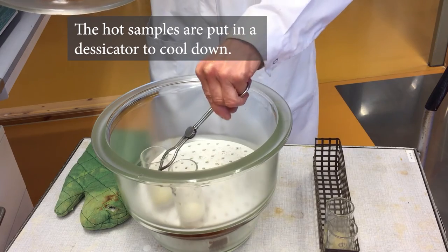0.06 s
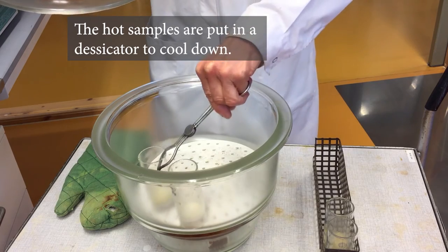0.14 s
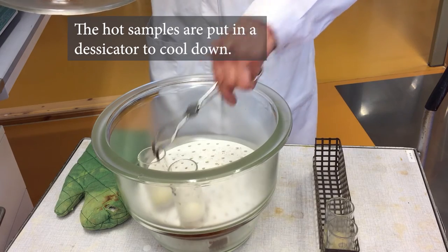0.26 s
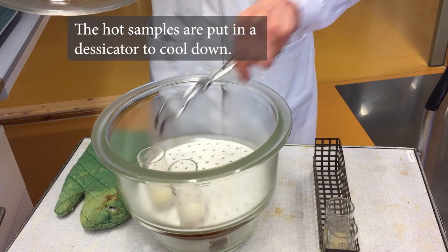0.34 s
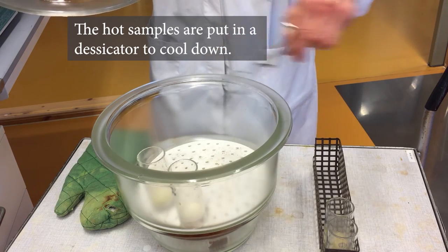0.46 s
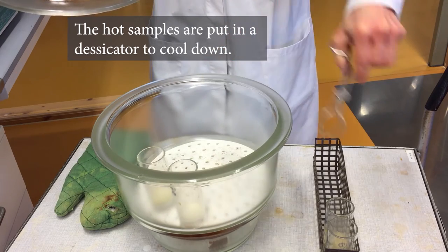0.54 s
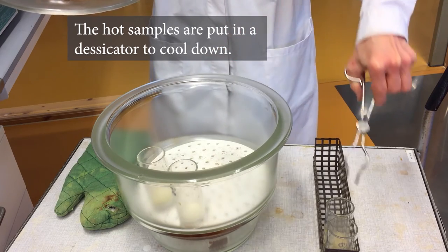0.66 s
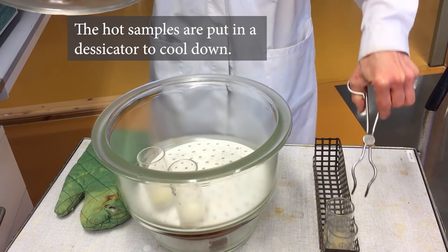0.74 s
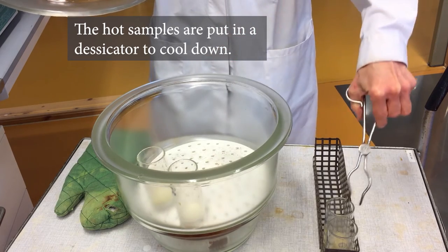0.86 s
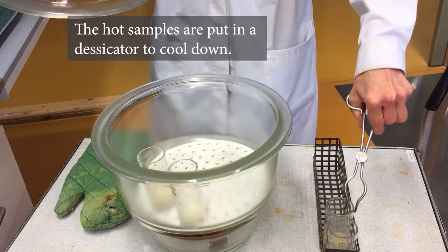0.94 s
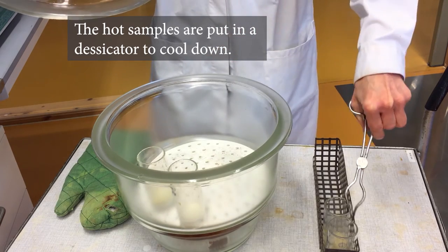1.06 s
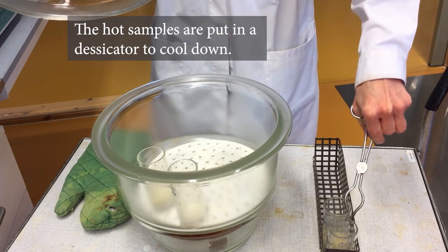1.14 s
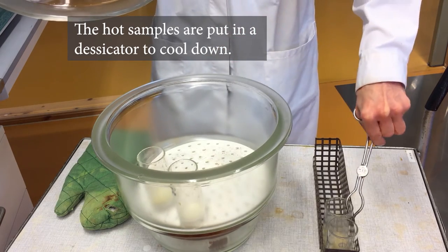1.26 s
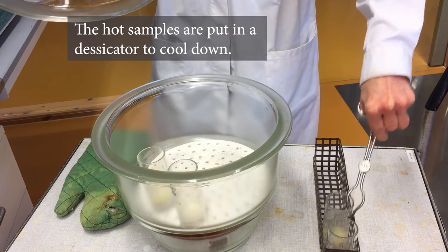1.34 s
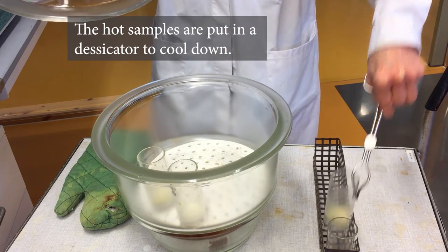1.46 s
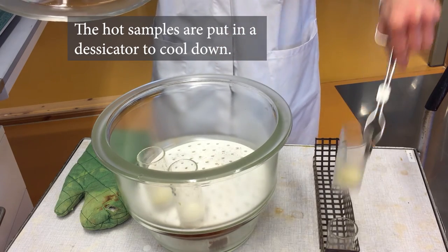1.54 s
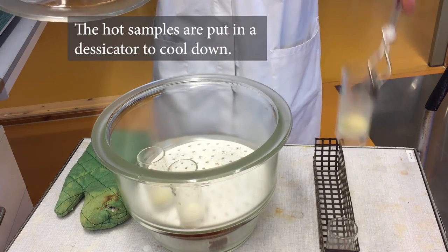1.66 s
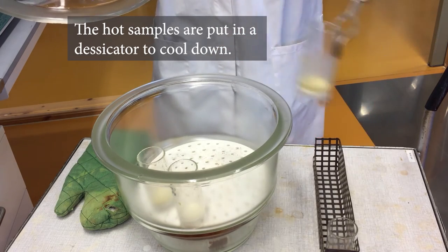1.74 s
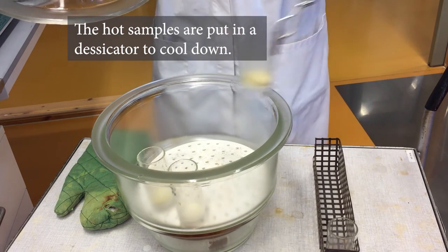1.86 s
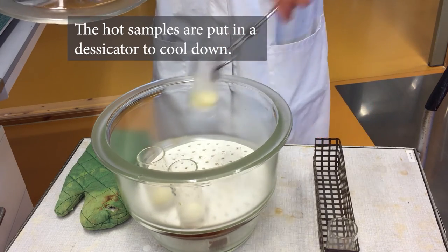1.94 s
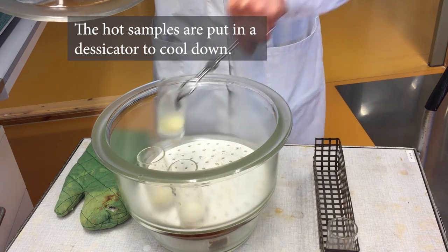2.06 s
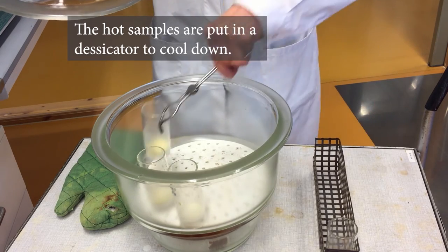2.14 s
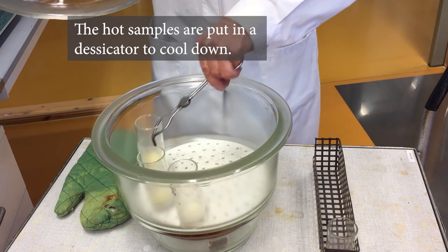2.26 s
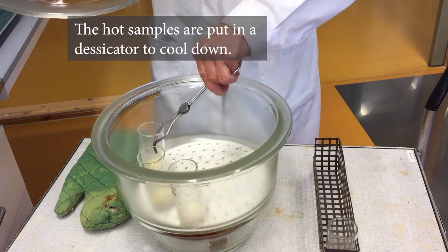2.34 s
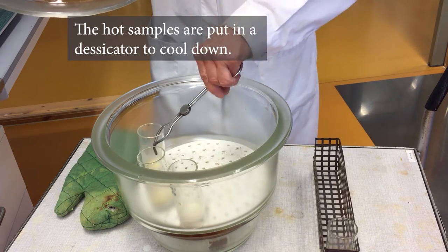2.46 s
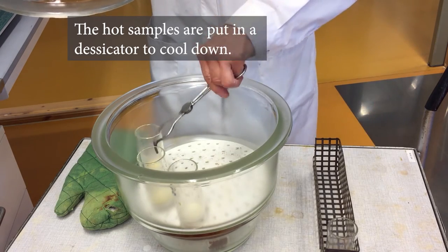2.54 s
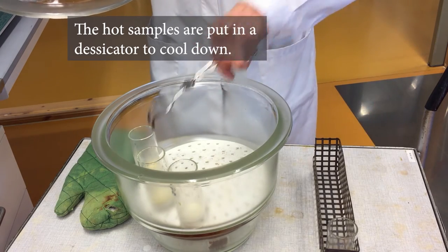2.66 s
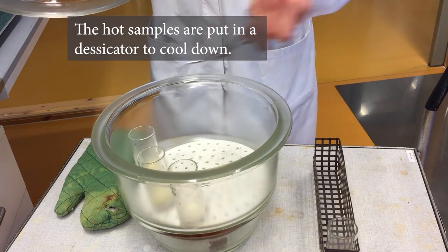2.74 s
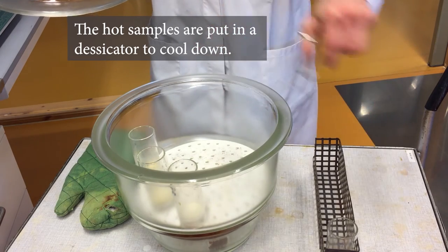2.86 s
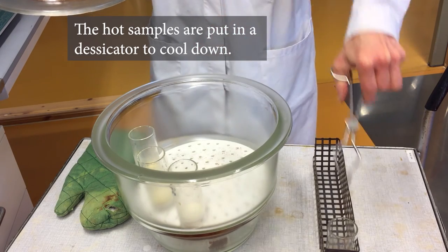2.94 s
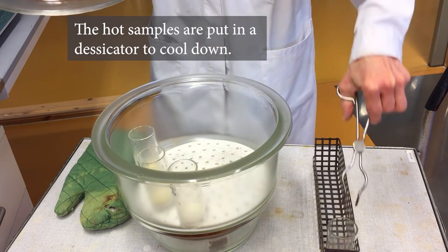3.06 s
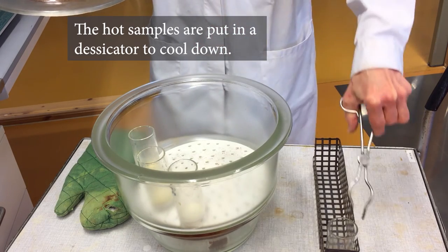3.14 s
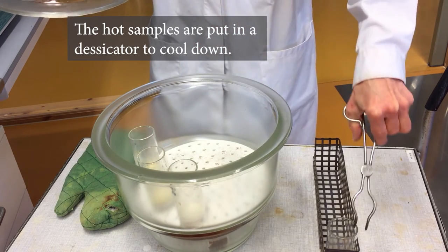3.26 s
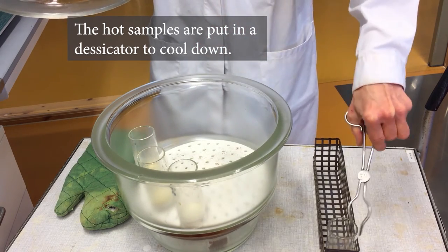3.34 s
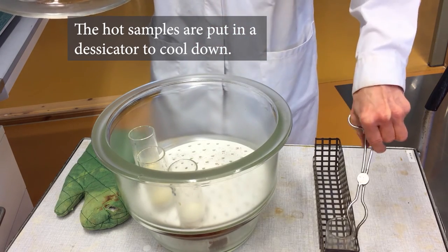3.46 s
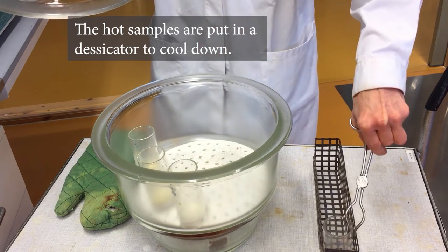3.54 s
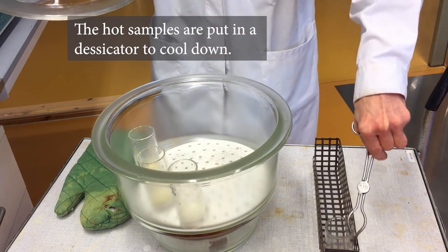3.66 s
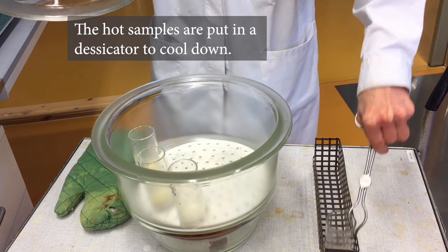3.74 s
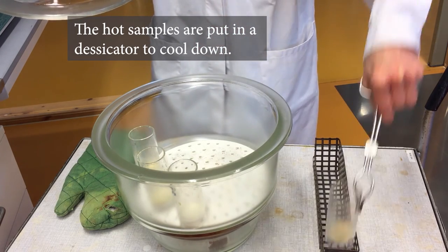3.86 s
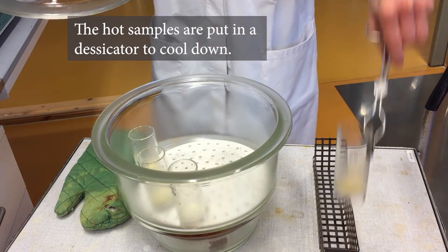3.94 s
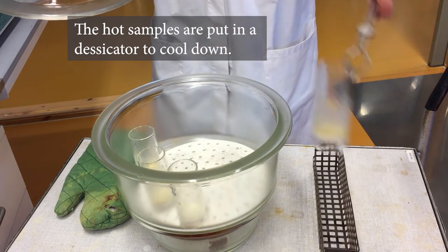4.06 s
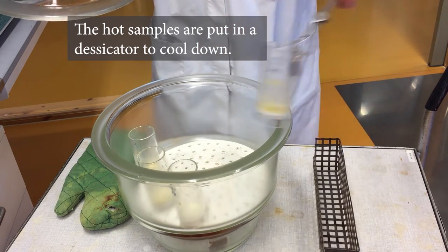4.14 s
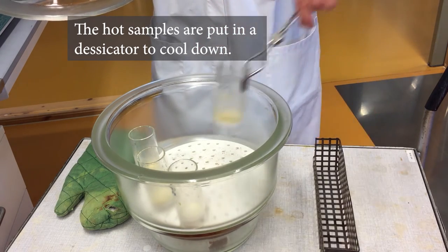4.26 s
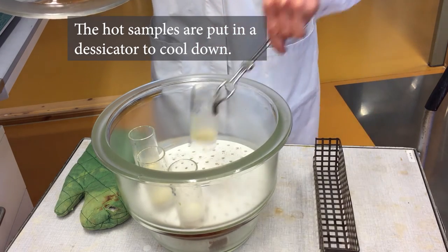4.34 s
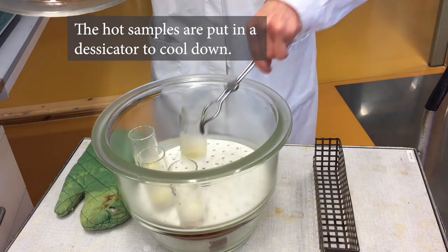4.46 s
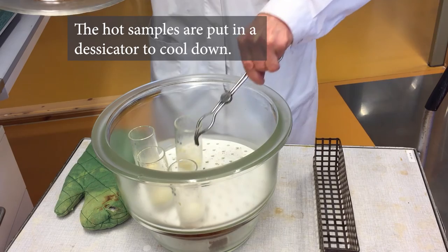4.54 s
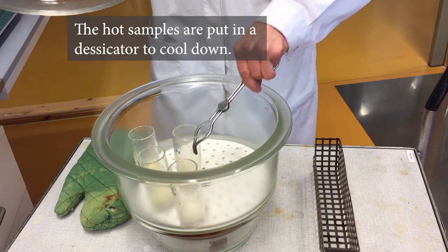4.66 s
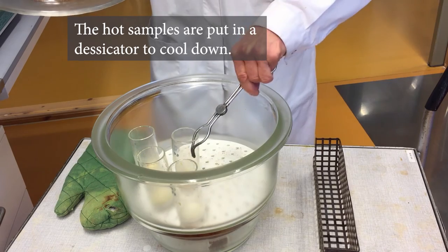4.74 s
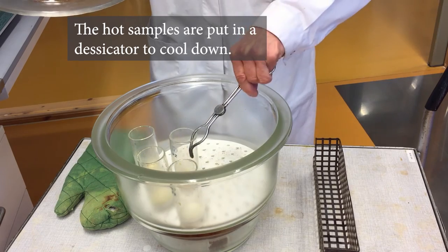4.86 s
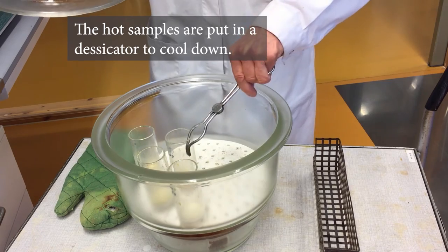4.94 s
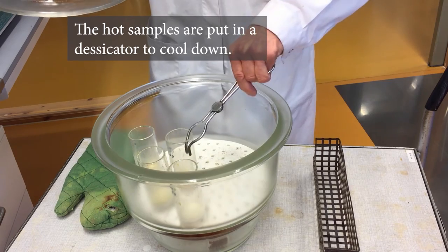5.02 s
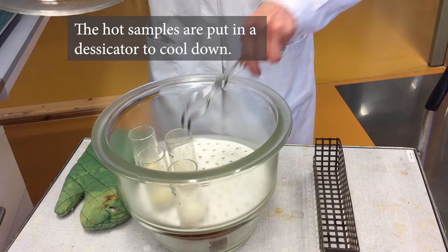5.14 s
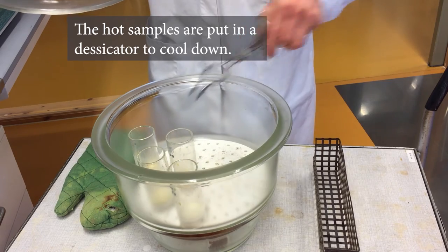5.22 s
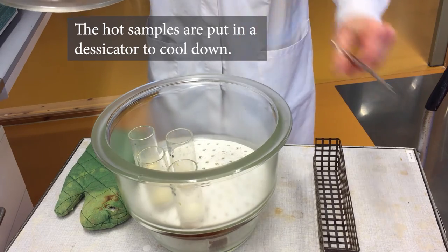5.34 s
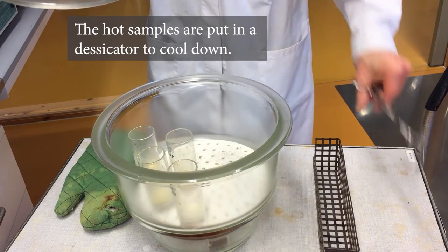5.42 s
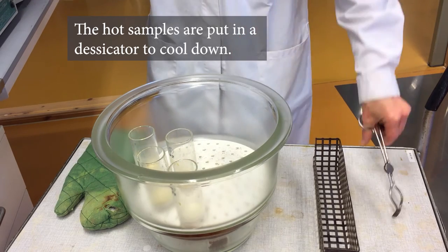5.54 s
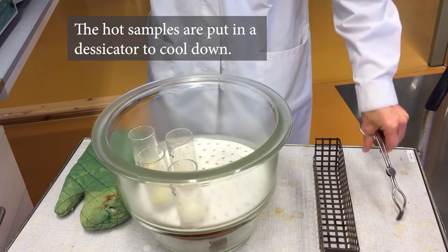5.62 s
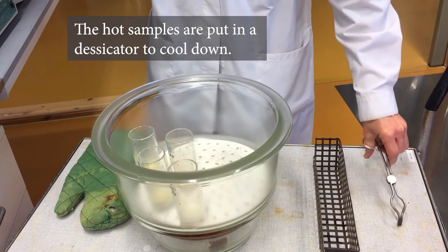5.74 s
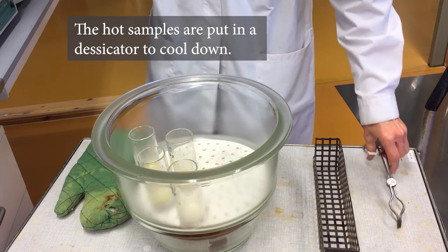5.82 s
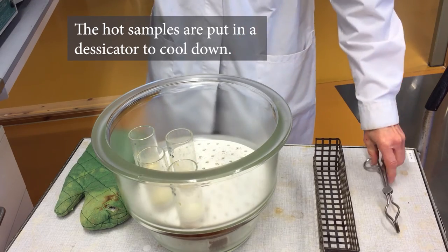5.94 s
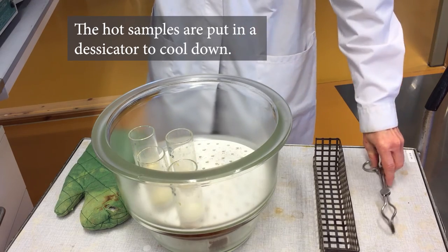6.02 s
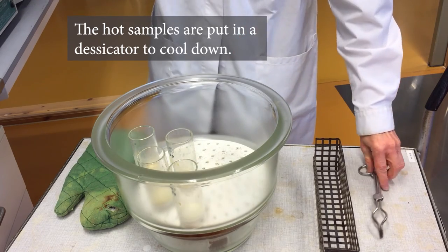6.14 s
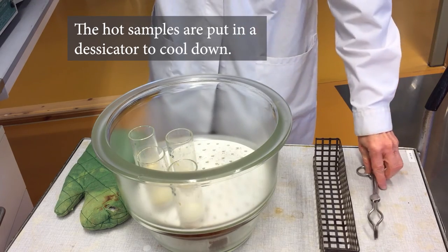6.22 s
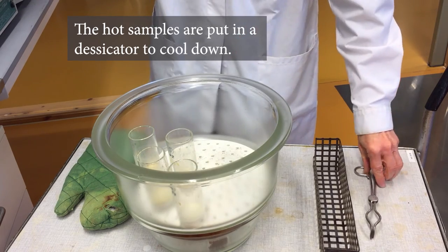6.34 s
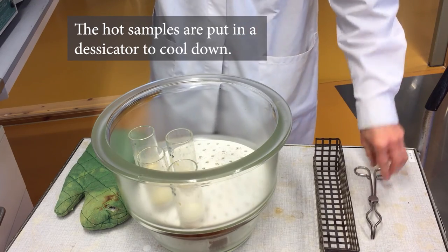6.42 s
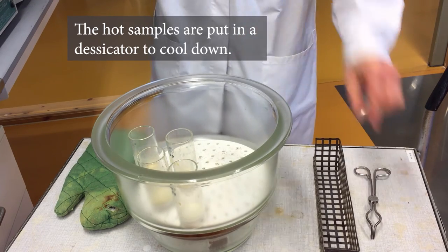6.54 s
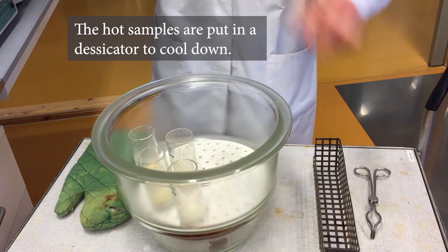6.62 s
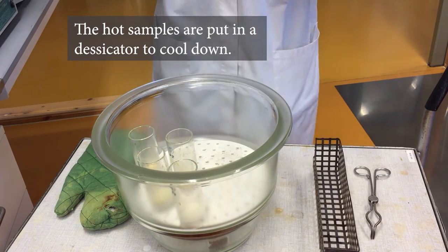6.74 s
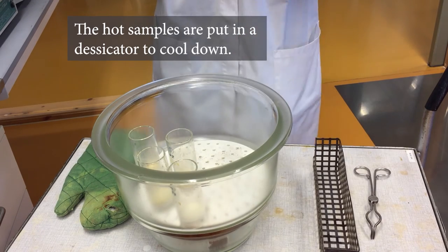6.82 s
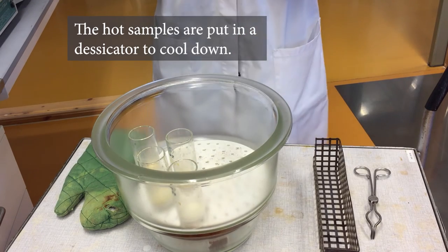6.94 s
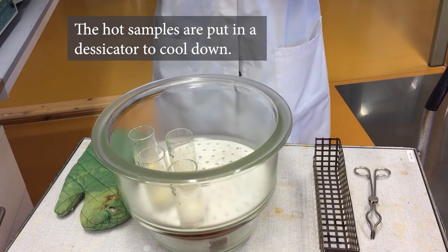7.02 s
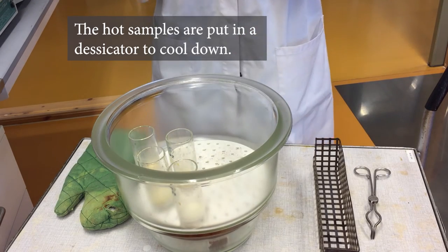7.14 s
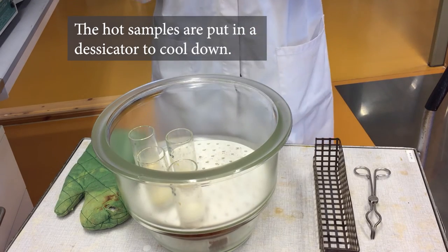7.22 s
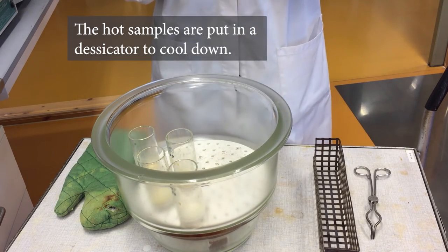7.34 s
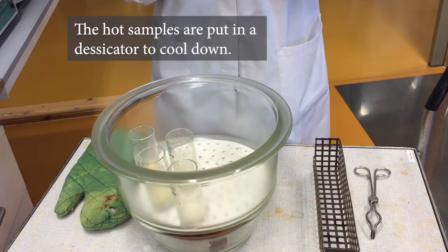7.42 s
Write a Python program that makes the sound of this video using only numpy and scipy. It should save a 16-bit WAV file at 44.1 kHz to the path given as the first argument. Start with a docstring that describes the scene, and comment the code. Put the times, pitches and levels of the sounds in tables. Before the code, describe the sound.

Close mono pickup in a small, lightly echoing laboratory with a faint steady ventilation rumble and hiss. A glass crucible clacks onto a plate and rocks to rest. Steel tongs tick, another crucible bumps and rasps out of a wire rack, then lands with bright double clacks and a ping. The rack scrape and landing repeat more briefly. The tongs squeak thinly, smack the bench, slide grittily and drop. Two faint distant clinks end it.

```python
"""Ventilation noise throughout: shaped random noise, a rumble and a hiss.
Glass crucibles clack onto a desiccator plate and rock to rest: noise bursts plus decaying modes.
Steel tongs tick and ping as they grip and let go; glass bumps and scrapes, by stick-slip, out of a wire rack.
A pivot squeaks as a thin, wavering sine; then the tongs strike the bench, slide by stick-slip, judder and drop.
Last come two faint, high, echoing clinks."""
import sys
import numpy as np
from scipy import signal
from scipy.fft import rfft, irfft, next_fast_len
from scipy.io import wavfile
from scipy.ndimage import uniform_filter1d, map_coordinates

SR = 44100
rng = np.random.default_rng(int(sys.argv[2]) if len(sys.argv) > 2 else 0)


def wav_record(signal):
    """Record a signal, one row per channel, as 16-bit PCM in the file named by sys.argv[1]."""
    frames = np.transpose(np.atleast_2d(signal))
    bounded = np.clip(frames, -1, 1)
    # unit amplitude maps onto the largest positive 16-bit level
    quanta = np.round(bounded * 32767).astype(np.int16)
    wavfile.write(sys.argv[1], SR, quanta)


N = 329868

# dense, short-lived vibration of a steel tick: freq_hz, rel_density_db_per_hz
TICK_SPECTRUM = [(1500, -38.5), (3000, -6.5), (3800, -3.5), (5000, -11), (6200, -5), (8200, -3), (9600, 11),
                 (11200, -5.5), (12600, 7), (14000, -14.5), (16000, -10.5)]


def amp(db):
    """Decibels to gain."""
    return 10 ** (np.asarray(db) / 20)


def unit(x):
    """Scale to rms 1."""
    return x / np.sqrt(np.mean(x ** 2) + 1e-20)


def along(points, hz):
    """(Hz, value) points read on a log frequency axis."""
    point_hz, values = np.transpose(points)
    return np.interp(np.log(hz + 1), np.log(point_hz + 1), values)


def filtered(x, response):
    """x times a zero-phase response of frequency."""
    m = next_fast_len(len(x) + SR // 10)
    hz = np.fft.rfftfreq(m, 1 / SR)
    return irfft(rfft(x, m) * response(hz), m)[:len(x)]


def coloured(x, spectrum):
    """x given a (Hz, dB) spectrum, at rms 1."""
    return unit(filtered(x, lambda hz: amp(along(spectrum, hz))))


def causal(x, spectrum):
    """x through a minimum-phase (Hz, dB) response: nothing rings before its cause."""
    m = next_fast_len(len(x) + SR // 10, real=True)
    hz = np.fft.rfftfreq(m, 1 / SR)
    cepstrum = irfft(np.log(amp(along(spectrum, hz))), m)
    # fold negative quefrencies onto positive ones
    cepstrum[1:m // 2] *= 2
    cepstrum[m // 2 + 1:] = 0
    return irfft(rfft(x, m) * np.exp(rfft(cepstrum)), m)[:len(x)]


def band(x, lo_hz, hi_hz):
    """The part of x between two frequencies, with soft edges."""
    return filtered(x, lambda hz: 1 / (1 + (hz / hi_hz) ** 8) - 1 / (1 + (hz / lo_hz) ** 8))


def gain_curve(rows):
    """(s, dB) rows as one smoothed gain per sample, silent outside the rows."""
    s, db = np.transpose(rows)
    curve_db = np.interp(np.arange(N) / SR, s, db, left=-np.inf, right=-np.inf)
    return uniform_filter1d(amp(curve_db), size=300)


def wobble(knots_per_s):
    """Smooth random curve through normally distributed knots."""
    knots = rng.standard_normal(int(N * knots_per_s / SR) + 4)
    return map_coordinates(knots, [np.arange(N) * knots_per_s / SR])


def add(track, s, x):
    """Mix x into the track at time s."""
    part = track[round(s * SR):][:len(x)]
    part += x[:len(part)]


def in_room(x, wet_db):
    """x plus the laboratory's reverberation, which builds up in a few ms and loses its treble first."""
    # reverberation time: freq_hz, t60_s
    room_t60 = [(100, 0.77), (300, 0.48), (1500, 0.38), (4000, 0.36), (8000, 0.28), (15000, 0.098)]
    # reverberation colour: freq_hz, gain_db
    echo_colour = [(200, 2.5), (2500, -1.5), (6000, -6), (15000, 0.5)]
    hz, t, bins = signal.stft(rng.standard_normal(SR // 2), SR, nperseg=256)
    decay = amp(-60 * t / along(room_t60, hz)[:, None])
    build_up = 1 - np.exp(-t / 0.0037)
    tail = signal.istft(bins * decay * build_up, SR, nperseg=256)[1]
    tail = filtered(tail / np.linalg.norm(tail), lambda hz: amp(along(echo_colour, hz)))
    return x + amp(wet_db) * signal.fftconvolve(x, tail)[:len(x)]


def strike(spectrum, modes, burst_t60_s, attack_s, ring_db):
    """One contact: a burst of dense, quickly damped vibration and a few lasting modes."""
    t = np.arange(SR * 3 // 5) / SR
    rise = 1 - np.exp(-t / attack_s)
    envelope = rise * amp(-60 * t / burst_t60_s)
    noise = envelope * rng.standard_normal(len(t))
    burst = unit(causal(noise, spectrum)) * np.std(envelope)
    hz, mode_db, t60_s = np.transpose(modes)[:, :, None]
    # each contact excites the modes unevenly
    shares_db = 2.5 * rng.standard_normal(hz.shape)
    phase_turns = rng.random(hz.shape)
    ring = amp(mode_db + shares_db - 60 * t / t60_s) * np.sin(2 * np.pi * (hz * t + phase_turns))
    return burst + amp(ring_db) * rise * ring.sum(axis=0)


def voiced(x, edges_hz, levels_db):
    """Spot and hardness of a contact set the strength of each band, gauged over its first 20 ms."""
    found = [np.std(band(x, lo, hi)[:SR // 50]) for lo, hi in zip(edges_hz, edges_hz[1:])]
    centres_hz = np.sqrt(np.multiply(edges_hz[:-1], edges_hz[1:]))
    correction_db = levels_db - 20 * np.log10(found)
    x = causal(x, np.column_stack([centres_hz, correction_db]))
    # high-pass: each contact keeps little below its lowest band
    highpass = signal.butter(3, edges_hz[0] * .85, "high", fs=SR, output="sos")
    return signal.sosfilt(highpass, x)


def blows(rows, edges_hz, balance_db, spot_db, spectrum, modes, burst_t60_s, attack_s, ring_db, wet_db):
    """Each row is a fresh echoing contact: hardness tilts its colour, the spot struck lifts about an octave."""
    track = np.zeros(N)
    octaves = np.log2(np.multiply(edges_hz[:-1], edges_hz[1:])) / 2
    for s, db, tilt_db, *spot_hz in rows:
        lift_db = spot_db * sum(np.exp(-2 * (octaves - np.log2(hz)) ** 2) for hz in spot_hz)
        levels_db = db + np.array(balance_db) + tilt_db * (octaves - octaves.mean()) + lift_db
        blow = in_room(strike(spectrum, modes, burst_t60_s, attack_s, ring_db), wet_db)
        add(track, s, voiced(blow, edges_hz, levels_db))
    return track


def slips(per_s, spread_db, clump_db):
    """Tiny stick-slip jerks of uneven size and random sign whose strength comes in clumps."""
    sizes = amp(spread_db * rng.standard_normal(N) + clump_db * wobble(70))
    happens = rng.random(N) < per_s / SR
    return happens * sizes * np.sign(rng.standard_normal(N))


def ringing(x, modes):
    """x shakes a set of decaying modes; rms 1."""
    t = np.arange(SR // 3) / SR
    response = sum(amp(db - 60 * t / t60_s) * np.sin(2 * np.pi * hz * t) for hz, db, t60_s in modes)
    return unit(signal.fftconvolve(x, response)[:len(x)])


def ventilation():
    """Air noise: a low rumble and a narrow hiss near 1.5 kHz, wavering together in level."""
    # air noise: freq_hz, rel_density_db_per_hz
    air_spectrum = [(20, -45.5), (30, -24.5), (48, -7.5), (95, 3), (180, -6.5), (290, -2.5), (450, -14.5),
                    (800, -15), (1300, -9), (1440, 3.5), (1520, 9), (1620, -3.5), (1800, -14), (4000, -28),
                    (15000, -39.5)]
    level_db = -55.0 + 0.23 * wobble(11.0)
    return amp(level_db) * coloured(rng.standard_normal(N), air_spectrum)


def swings(count):
    """Contacts of rocking crucibles come ever sooner, weaker and duller."""
    # rocking: start_s, first_swing_s, rel_level_db, loss_db_per_swing, tilt_db_per_octave, favoured_hz
    rocks = [(0.262, 0.111, -41, 8.5, 2, 260), (4.958, 0.181, -51, 1.5, -2.5, 900)]
    shrink = .83  # duration ratio of successive swings
    dulling = 0.33  # dB per octave of tilt lost per dB of strength
    contacts = []
    for s, swing_s, db, loss_db, tilt_db, hz in rocks:
        for k in range(count):
            contact_s = s + swing_s * np.sum(shrink ** np.arange(k))
            lost_db = k * loss_db
            contacts.append((contact_s, db - lost_db, tilt_db - lost_db * dulling, hz))
    return contacts


def crucibles():
    """Hard landings ring the glass; nudges and rocking only excite the plate."""
    # crucible on plate or neighbours, often twice in a few ms:
    # start_s, rel_level_db, tilt_db_per_octave, favoured_hz
    clacks = [(0.0638, -27.5, 0, 6300), (0.0668, -28, -1.5, 1400), (2.4265, -23.5, 1.3, 700),
              (2.4312, -22.5, -0.5, 265), (2.6398, -25.5, -1.5, 11000), (2.65, -28, 2.6, 1530),
              (4.7912, -25.5, -1.54, 3500), (4.9915, -31, -1.1, 260), (5.002, -35.5, -3, 1420)]
    # landing bands: edge_hz; then balance_db per band
    clack_edges_hz = [150, 450, 1000, 2000, 3500, 5000, 8000, 16000]
    clack_balance_db = [-10, -10, -1, -1.5, -6.5, -11, -19.5]
    # dense vibration of a landing: freq_hz, rel_density_db_per_hz
    clack_spectrum = [(120, -32.5), (200, -22.5), (300, 2.5), (400, 0), (650, 7.5), (950, 0.5), (1600, 0),
                      (2000, -3), (2900, 9), (3800, -7), (4200, 10), (4900, -18.5), (6200, -14),
                      (15000, -48)]
    # glass modes: freq_hz, rel_level_db, t60_s
    glass_modes = [(215, -8.5, 0.15), (296.6, 0.5, 0.23), (598, -7, .3), (821.6, -12, 0.096),
                   (1194, -14.5, 0.32), (1581, -14.5, 0.46), (1666, -5.5, 0.22), (1730, -13, 0.17),
                   (1820, -12, .25), (2117, -10, 0.097), (2440, -9.5, 0.28), (2670, -8, 0.06),
                   (2945, -9, 0.27), (3030, 1.5, 0.075), (3320, -3, 0.24), (3580, -5.5, 0.27),
                   (4160, -9.5, .26), (4520, -6, 0.13), (4310, -7.5, 0.21), (4835, -20.5, 0.34),
                   (5300, -18, 0.44), (5710, -14, 0.31), (5820, -13.5, .2), (6020, -18, 0.35),
                   (6385, -16.5, 0.2), (6864, -22, 0.23), (6970, -12, .2), (7670, -27.5, 0.2),
                   (8800, -19, 0.15), (9630, -17, 0.07), (11400, -29.5, 0.18)]
    # opening jaws nudge a standing crucible: start_s, rel_level_db, tilt_db_per_octave, favoured_hz
    nudges = [(0.186, -40, -1, 266), (0.223, -57.5, 12.5, 1300)]
    # nudge and swing bands: edge_hz; then balance_db per band
    rock_edges_hz = [150, 450, 900, 2000, 5000]
    rock_balance_db = [-4.5, -1.5, 1, -8.5]
    # dense vibration of a nudge or swing: freq_hz, rel_density_db_per_hz
    rock_spectrum = [(150, -21.5), (300, -24), (430, -2.5), (620, 5), (850, -8.5), (1150, -9.5), (1700, 1),
                     (2200, -14.5), (2900, -6.5), (5000, -38.5), (12000, -54.5)]
    # plate modes: freq_hz, rel_level_db, t60_s
    plate_modes = [(272, -10, 0.1), (324, 8.5, 0.16), (592, -2, 0.094), (1103, 8.5, 0.088),
                   (1330, 1.5, 0.12), (1510, -7.5, 0.36), (2480, -19.5, .3), (2860, -3.5, 0.13)]
    landing = blows(clacks, clack_edges_hz, clack_balance_db, spot_db=4,
                    spectrum=clack_spectrum, modes=glass_modes,
                    burst_t60_s=0.056, attack_s=0.00033, ring_db=-16.5, wet_db=-9.5)
    rocking = blows(nudges + swings(count=5), rock_edges_hz, rock_balance_db, spot_db=9,
                    spectrum=rock_spectrum, modes=plate_modes,
                    burst_t60_s=.07, attack_s=.004, ring_db=-11, wet_db=-9)
    return amp(-2.0) * landing + amp(-2.57) * rocking


def tongs():
    """Jaws and pivot tick as light steel; one thin squeak, a wavering sine, as the dry pivot closes."""
    # ticks of jaws and pivot: start_s, rel_level_db, tilt_db_per_octave
    tick_rows = [(0.108, -51, 0), (0.232, -45.5, -2), (0.984, -55, -4.5), (1.2315, -46.5, -4),
                 (1.665, -50, -7.5), (2.592, -49.5, -14), (3.4145, -42.5, 9), (3.4238, -50.5, 0),
                 (3.643, -48.5, 4), (3.849, -46.5, -0.5), (3.996, -62, -8), (4.438, -63, -12),
                 (4.886, -59, -12), (5.004, -42, -9.5), (5.346, -57, 5)]
    # tick bands: edge_hz; then balance_db per band
    tick_edges_hz = [3000, 5000, 8500, 16000]
    tick_balance_db = [-3.5, -1.5, 0]
    # steel modes: freq_hz, rel_level_db, t60_s
    steel_modes = [(3650, -8, .12), (3900, -10, .08), (4330, -10, .08), (4750, -12, .1), (6200, -10, .1),
                   (7472, -8, .1), (9356, -5, .17), (9950, -2, .2), (10290, -6, .2), (11850, -6, .2),
                   (12900, -6, .13), (13480, -10, .1)]
    ticks = blows(tick_rows, tick_edges_hz, tick_balance_db, spot_db=0,
                  spectrum=TICK_SPECTRUM, modes=steel_modes,
                  burst_t60_s=0.024, attack_s=0.00052, ring_db=-20.5, wet_db=-5)
    # time_s, peak_db
    squeak_db = [(5.262, -83.5), (5.285, -33), (5.303, -41), (5.315, -68), (5.33, -78)]
    pitch_hz = 15450 + 120 * wobble(400)
    squeak = gain_curve(squeak_db) * np.sin(2 * np.pi * np.cumsum(pitch_hz) / SR)
    return amp(-5.0) * ticks + in_room(squeak, wet_db=0.5)


def pings():
    """The arms of the tongs ring on one note, pitched by the grip, when the jaws slip on glass."""
    # pings: start_s, pitch_hz, rel_level_db
    ping_rows = [(0.197, 3604, -51.5), (0.232, 3610, -50.5), (2.593, 3710, -42), (2.65, 3580, -48),
                 (4.795, 3585, -45), (4.835, 3585, -42)]
    track = np.zeros(N)
    t = np.arange(SR // 2) / SR
    rise = 1 - np.exp(-t / 0.0024)
    for s, hz, db in ping_rows:
        add(track, s, amp(db - 60 * t / 0.49) * rise * np.sin(2 * np.pi * hz * t))
    return amp(1.5) * in_room(track, wet_db=-24)


def scrape_gain(fade_db_per_s, order):
    """Gain of one scrape band: each scrape swells as the wire loads, then fades as the glass slips free."""
    # glass dragged over a wire: start_s, rise_s, rel_peak_db, tilt_db_per_band
    scrapes = [(1.114, 0.019, -38.5, 3.5), (1.19, 0.033, -37, -16), (1.29, 0.016, -40, 3),
               (1.383, 0.062, -34.5, 0), (3.424, 0.028, -48.5, -5.5), (3.51, 0.02, -70.5, 14.5),
               (3.554, 0.026, -35, -3.5), (3.69, 0.11, -43.5, 0.5)]
    swell_db = 13
    power = np.zeros(N)
    for s, rise_s, db, tilt_db in scrapes:
        t = np.arange(N) / SR - s
        rising_db = swell_db * (t / rise_s - 1)
        fading_db = fade_db_per_s * (rise_s - t)
        shape_db = np.minimum(rising_db, fading_db)
        power += (t > 0) * amp(db + order * tilt_db + shape_db) ** 2
    return uniform_filter1d(np.sqrt(power), size=300)


def rack():
    """A gripped crucible bumps the wire rack and rasps along it by stick-slip on the way out."""
    # bumps: start_s, rel_level_db, tilt_db_per_octave
    bump_rows = [(1.029, -56, -4.5), (1.07, -73.5, -12.5), (1.1135, -33.5, 3), (1.285, -38.5, -0.5),
                 (1.485, -34.5, -1), (3.425, -57.5, -6.5), (3.557, -40, -2)]
    # bump bands: edge_hz; then balance_db per band
    rack_edges_hz = [150, 700, 2000, 6000, 16000]
    rack_balance_db = [3, -2, -3.5, -9.5]
    # dense rack vibration: freq_hz, rel_density_db_per_hz
    rack_spectrum = [(71, -49), (120, -15), (251, -3), (289, 7.5), (393, 4), (503, 2), (727, -5),
                     (1050, -13), (1370, -18.5), (2110, -19), (2810, -24), (3740, -26), (7660, -19.5),
                     (9020, -17.5), (16000, -25)]
    # wire modes: freq_hz, rel_level_db, t60_s
    wire_modes = [(299.4, 6.5, 0.098), (350, 0.5, 0.45), (517, 5, 0.66), (691, 10, 0.089), (1110, -9, 0.18),
                  (1228, -9.5, 0.45), (1456, -22.5, 0.61), (2085, -11, 0.54), (2410, -10, 0.18),
                  (2613, -22, 0.13), (3700, -4, 0.064), (4304, -11.5, 0.19), (5230, -22, 1),
                  (6750, -5, 0.2)]
    # rattle, rasp and hiss, treble fading first: share_db, fade_db_per_s; then edge_hz
    scrape_bands = [(-3, 75.5), (-3, 100), (-17, 135)]
    scrape_edges_hz = [100, 900, 5000, 17000]
    bumps = blows(bump_rows, rack_edges_hz, rack_balance_db, spot_db=0,
                  spectrum=rack_spectrum, modes=wire_modes,
                  burst_t60_s=0.18, attack_s=0.00014, ring_db=-14.5, wet_db=-7)
    jerks = in_room(slips(per_s=1400, spread_db=1.5, clump_db=3.5), wet_db=-0.5)
    rub = coloured(jerks, rack_spectrum) + amp(-7.5) * ringing(jerks, wire_modes)
    scrape = np.zeros(N)
    for k, (share_db, fade_db_per_s) in enumerate(scrape_bands):
        part = unit(band(rub, *scrape_edges_hz[k:k + 2]))
        scrape += amp(share_db) * scrape_gain(fade_db_per_s, order=k) * part
    return amp(-7.0) * bumps + scrape


def bench():
    """Tongs strike, slide by stick-slip, judder as the arms are pressed flat, then fall and bounce."""
    # strikes and bounces: start_s, level_db, tilt_db_per_octave, favoured_hz
    drop_rows = [(5.6085, -22.5, 0.55, 1400), (5.6295, -41, -1, 1200), (5.6445, -34, -3, 2330),
                 (5.657, -33.5, -1.5, 1400), (6.0295, -29, -.6, 5630), (6.4112, -27.5, 1.1, 6700),
                 (6.432, -34, 4.6, 1300), (6.452, -33, -1.4, 400), (6.4655, -42, 4.5, 3000)]
    # drop bands: edge_hz; then balance_db per band
    bench_edges_hz = [50, 200, 800, 2000, 4500, 8000, 16000]
    bench_balance_db = [-24, -18, -7, 0, -7, -9]
    # dense vibration of a drop: freq_hz, rel_density_db_per_hz
    knock_spectrum = [(40, -18), (120, -6), (550, -13), (800, -4.5), (1100, 6.5), (1500, 0.5), (2300, 5.5),
                      (3300, -2.5), (3700, -6.5), (4300, -5), (4900, -15.5), (5500, -3.5), (6700, -12.5),
                      (7400, -20), (9300, -31), (16000, -53.5)]
    # bench modes when struck: freq_hz, rel_level_db, t60_s
    bench_modes = [(275.2, -12.5, 0.36), (444.8, -13.5, 0.44), (689, -8.5, 0.18), (1132, 0.5, .29),
                   (1292, -3, 0.28), (1674, -7.5, 0.41), (1887, 0, 0.31), (2230, 1, 0.17),
                   (2277, -1.5, 0.31), (2470, -11, 0.27), (2730, -11, 0.242), (3170, -1.5, .2),
                   (3360, -6.5, .15), (4210, -11, 0.21), (4440, -13.5, 0.14), (5410, -16, .13),
                   (5970, -22, 0.095), (6960, -24, 0.11), (8140, -27, 0.079), (9370, -24.5, 0.078)]
    # sliding tips: time_s, rel_level_db
    slide_db = [(5.78, -33.5), (5.864, -43), (5.888, -37), (6.02, -46), (6.03, -38), (6.074, -33),
                (6.166, -30), (6.176, -27), (6.4, -44.5)]
    # dense vibration of the slide: freq_hz, rel_density_db_per_hz
    grit_spectrum = [(400, -30), (700, -3.5), (1000, -12), (1400, 5), (1750, 6.5), (2500, -1.5), (3600, -7),
                     (5000, -17.5), (9000, -25.5), (14000, -38)]
    # bench top under the tips: freq_hz, rel_level_db, t60_s
    board_modes = [(1360, -4, .15), (1550, -9, 0.2), (1690, 18, 0.165), (1840, -4, .15), (1810, -4.5, .15),
                   (2240, -16, 0.13), (2960, -5, 0.11)]
    # juddering arms: freq_hz, rel_level_db, t60_s
    arm_modes = [(678, 0, .45), (845, 0, .45), (6100, -16, .05), (8300, -16, .04), (9100, -16, .04),
                 (11000, -13, .03)]
    # judder: time_s, level_db
    judder_db = [(6.1, -78), (6.17, -53), (6.25, -51), (6.33, -57), (6.38, -76)]
    drops = blows(drop_rows, bench_edges_hz, bench_balance_db, spot_db=7.5,
                  spectrum=knock_spectrum, modes=bench_modes,
                  burst_t60_s=0.029, attack_s=1 / 8000, ring_db=-22, wet_db=-5)
    jerks = in_room(slips(per_s=1300, spread_db=0.5, clump_db=2.0), wet_db=0.5)
    rub = unit(coloured(jerks, grit_spectrum) + amp(-16.0) * ringing(jerks, board_modes))
    slide = amp(-8.0) * gain_curve(slide_db) * rub
    judder = gain_curve(judder_db) * ringing(jerks, arm_modes)
    return drops + slide + judder


def far_clinks():
    """Two faint, high clinks across the room: short strikes with more echo than direct sound."""
    track = np.zeros(N)
    # freq_hz, rel_level_db, t60_s
    modes = [(4100, -6, .2), (4750, -2, .22), (5650, 0, .25), (6150, -4, .2), (6650, -4, .22)]
    for s, db in [(7.038, -67), (7.128, -70)]:
        clink = strike(TICK_SPECTRUM, modes, burst_t60_s=.06, attack_s=.002, ring_db=-5)
        add(track, s, amp(db) * clink)
    return in_room(track, wet_db=5.0)


def scene():
    """All sources summed to one channel."""
    mix = ventilation() + crucibles() + tongs() + pings() + rack() + bench() + far_clinks()
    return mix[None]


def record(dry):
    """Steep low-pass: the microphone channel keeps almost nothing above its band limit."""
    top_hz = 16200
    return np.array([filtered(x, lambda hz: 1 / (1 + (hz / top_hz) ** 120)) for x in dry])


dry = scene()
out = record(dry)
wav_record(out)
```